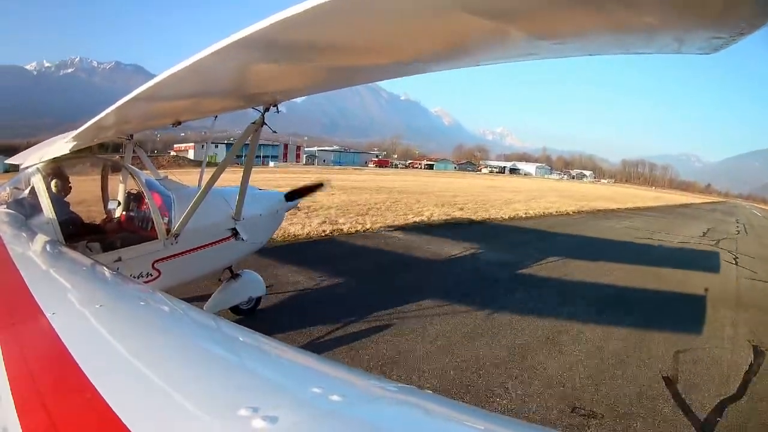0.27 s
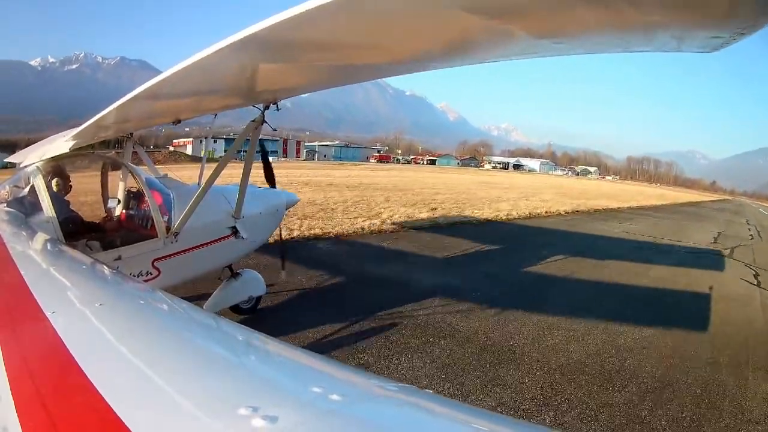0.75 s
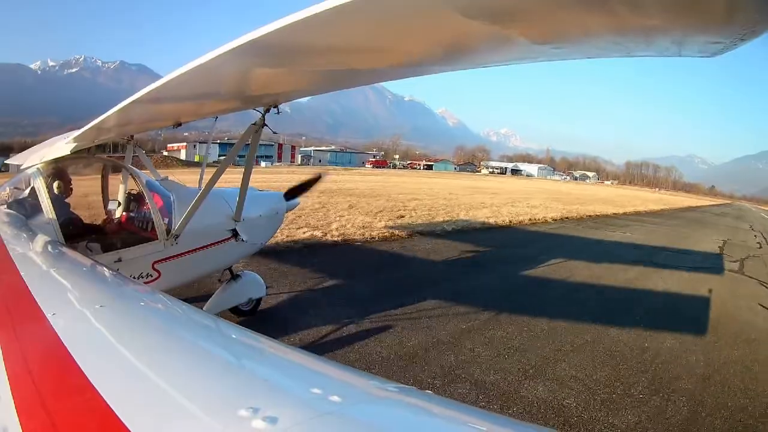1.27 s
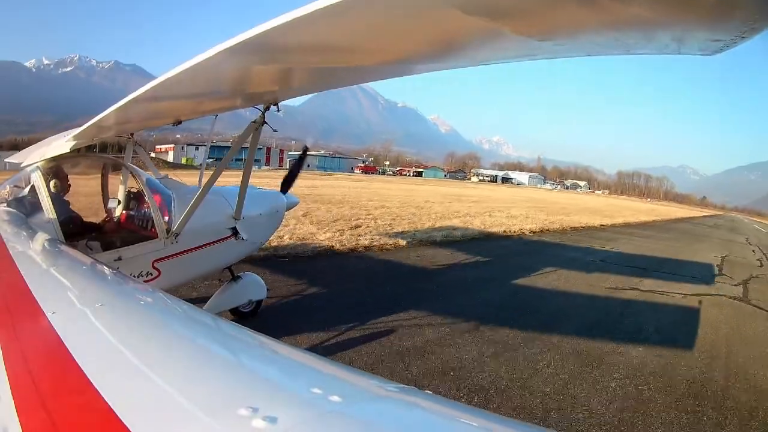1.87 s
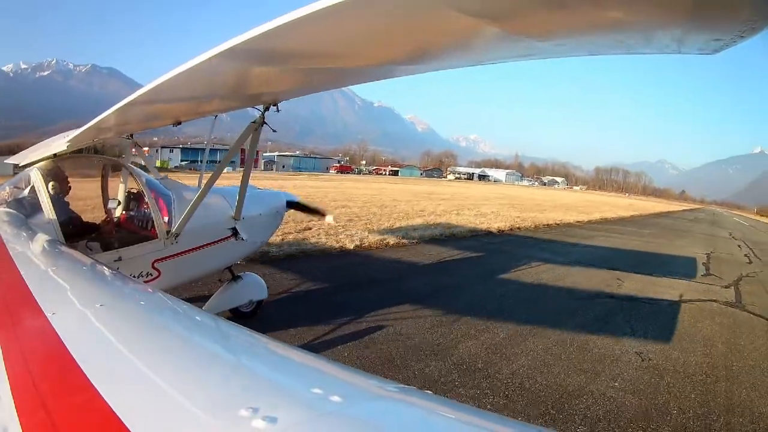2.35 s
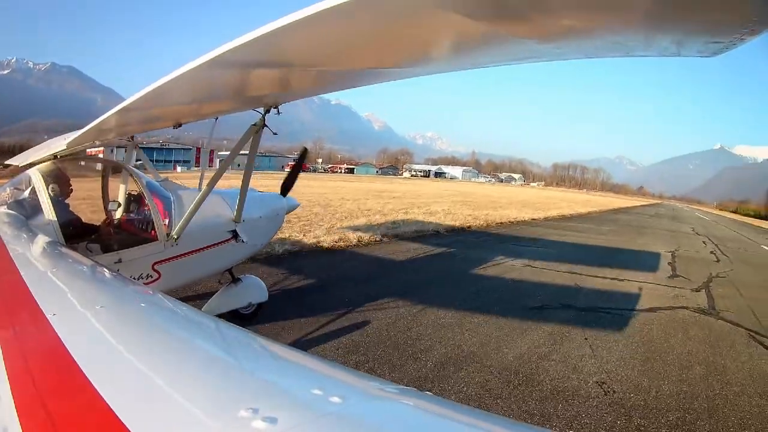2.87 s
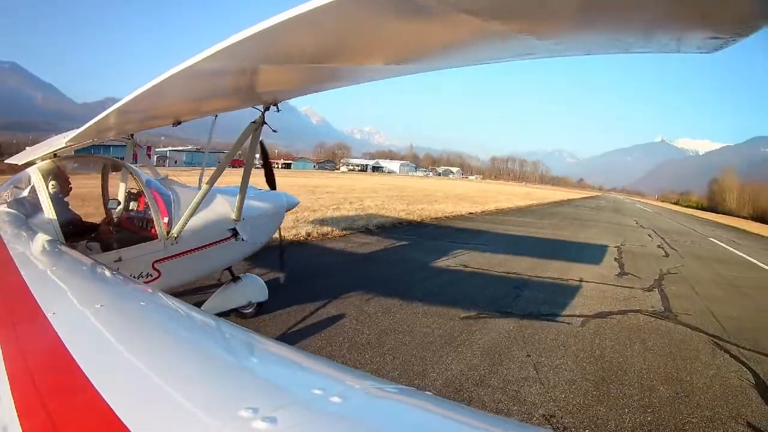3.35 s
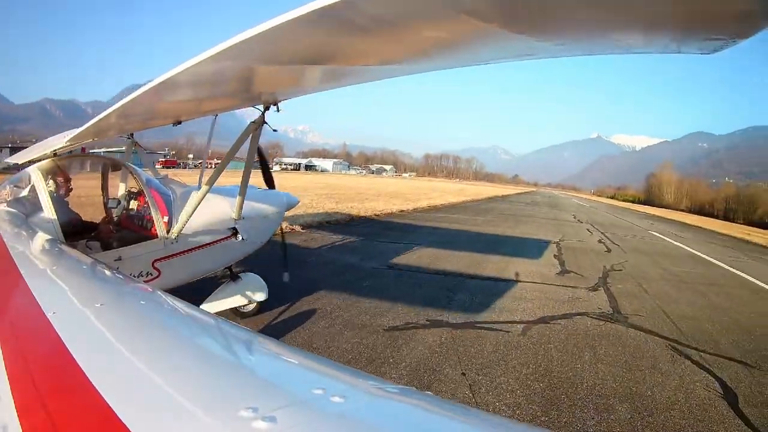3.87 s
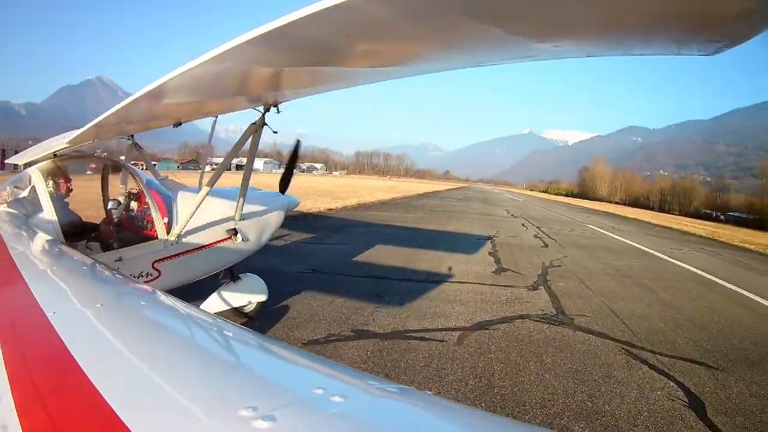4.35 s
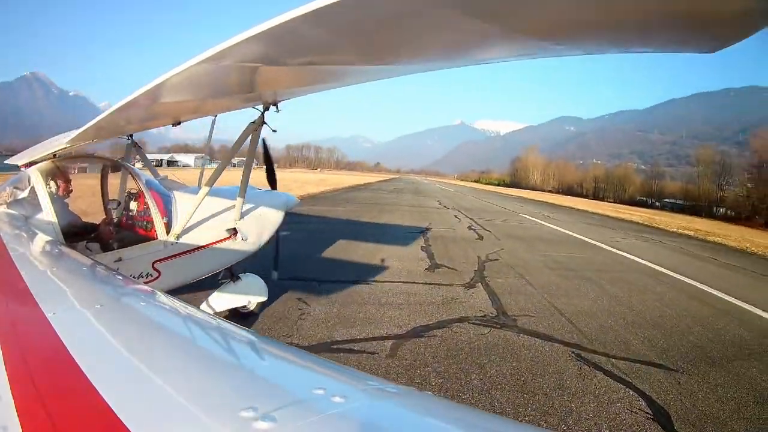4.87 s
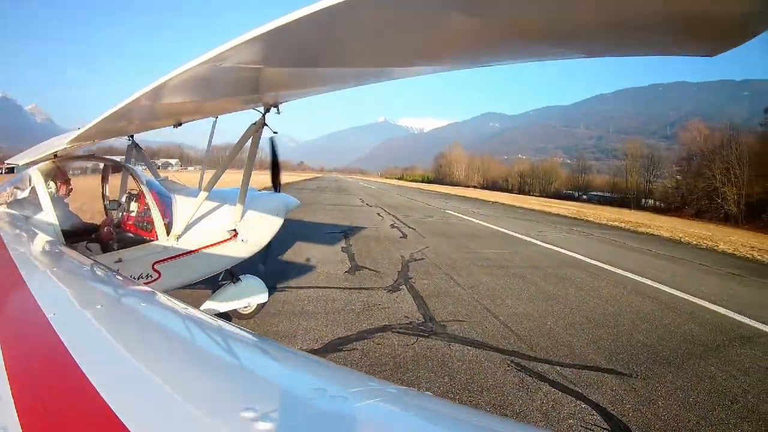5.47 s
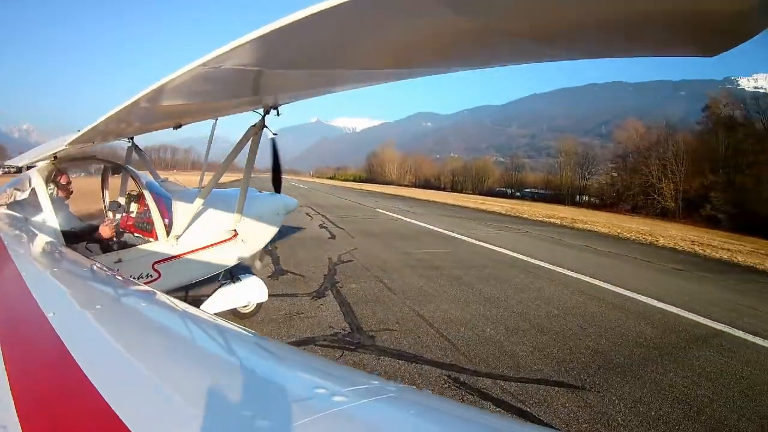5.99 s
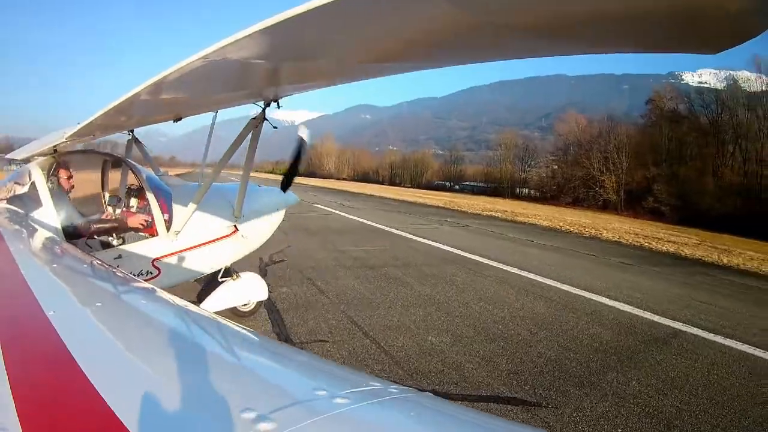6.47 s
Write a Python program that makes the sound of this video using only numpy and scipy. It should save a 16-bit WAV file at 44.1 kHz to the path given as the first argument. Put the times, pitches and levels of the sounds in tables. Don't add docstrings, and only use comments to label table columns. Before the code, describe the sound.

Dull wind buffeting and low taxiing rumble under overloaded thuds and dry case rattle, building to rapid regular pounding with short squeaks.

```python
import sys
import numpy as np
from scipy import signal
from scipy.io import wavfile
from scipy.ndimage import uniform_filter1d

SR = 44100
rng = np.random.default_rng(int(sys.argv[2]) if len(sys.argv) > 2 else 0)


def to_wav(s):
    ch = np.atleast_2d(s).T
    pcm = np.round(np.clip(ch, -1, 1) * 32767)
    wavfile.write(sys.argv[1], SR, pcm.astype(np.int16))


def boost(x):
    u = np.asarray(x, float) / 20
    return 10 ** u


N = 296352

# time in seconds, airflow in dB, engine effort in dB.
LOAD = [(0, -0.5, -1.5), (.32, 2, -1), (.66, 2.5, 3), (.89, 2, -1), (1.38, -4, -4.5), (1.9, -8, 1),
        (2.4, -5.5, 2), (3.02, -6.5, 3), (3.5, -5.5, 2), (3.85, -8.5, 5.5), (4.2, -7.5, 2.5),
        (4.6, -5.5, 8), (5.15, -7.5, 5), (5.67, -5, 7.5), (5.96, 9, 8), (6.2, 10, 10), (6.72, 10, 15)]
TYRE_TONES = [(148.7, 64, 4), (216, 71, 5.5), (318, 150, -5)]
DRONE_TONES = [(556, 380, -1.5), (900, 400, -5), (1460, 880, -4.5)]
CASE_TONES = [(2120, 910, -7.5), (4230, 700, 2.5), (5135, 475, 3.5), (5780, 1630, -0.5)]
BODY_TONES = [(545, 253, -0.5), (1470, 900, -6.5), (2300, 400, -7)]
SIZZLE_TONES = [(8800, 1530, -3.5), (10560, 520, 0.5)]
# pitch in Hz, level in dB.
ENGINE_TONES = [(21.5, -41.5), (129.2, -52)]
# time in seconds, peak in dB, suction before the snap in dB,
# snap time in ms.
SLAMS = [(0.02, -15, 8, 1), (0.209, -1.5, 1, 0.2), (0.479, -12, 7, 0.81), (0.534, 4, -12, 0.24),
         (0.539, -3, -20, 0.3), (0.793, 1, -3.5, 0.35), (0.881, -0.5, 1, 0.19), (0.974, -1.5, 4, 0.31),
         (1.064, 0.5, -3, 0.63), (2.119, 1.5, -1.5, 0.91), (2.269, -17, -16, 0.55), (2.329, -17, -3, 0.19),
         (2.581, -5.5, 0, 0.42), (2.629, -4, 2, 0.2), (2.677, -2, 2.5, 0.85), (3.005, -4, 4, 0.59),
         (3.054, 1, -1.5, 0.22), (3.098, 2, -2.5, 0.35), (4.024, -2.5, 0, 0.22), (4.07, 2.5, 0.5, 0.32),
         (4.111, 1.5, -1.5, 0.32), (4.149, -2.5, 3.5, 1), (4.191, -0.5, -8, 1), (4.282, -10, 9, 0.68),
         (4.451, -1.5, -2.5, 0.82), (5.126, -9.5, -11, 0.25), (5.161, -8.5, -2, 0.5),
         (5.194, -9.5, -6, 0.41), (5.703, -14.5, 4, 0.84), (5.763, -0.5, -7.5, 0.45)]
# time in seconds, peak in dB, push before the drop
# as a share of the peak, drop time in ms.
PULLS = [(.30, -13, 0.48, 2), (0.626, -15, 0.57, 0.61), (2.148, -10, .4, 2), (4.252, -16, 0.35, 0.9),
         (4.487, -14, .4, 2), (5.014, -18.5, 0.46, 2.03), (5.096, -15, 0.71, 1.2), (0.5185, 1, 0.4, 2.2),
         (0.5335, -7, 1.1, 0.9), (0.5385, 1, 0.05, 0.7), (.780, -4.5, 0.2, 0.99), (.865, -2.5, 0.31, 1.1),
         (0.956, 2, 0.33, 1.7), (1.045, -5.5, 0.67, 1.596), (2.572, -10, 0.34, 3.5), (2.617, 0.5, 0.27, 2),
         (3.038, -15, 0.29, 1.2), (3.085, -18, 0.44, 2), (4.062, -3, 0.2, 1), (4.1, -0.5, 0.47, 3.5),
         (4.141, -5, 0.26, 4.6), (4.185, -4, 0.22, 2.8), (4.359, -10, 0.27, 2), (4.444, -4, 0.17, 3.3),
         (5.146, -13.5, 0.7, 0.77), (5.18, -13.5, 0.73, 0.81), (5.754, 1.5, 0.19, 4.1),
         (5.798, -3.5, 0.27, 0.67)]
# time in seconds, shakes in Hz, first slam and second slam
# as signed pressures, lead of the second slam in ms.
SHAKING = [
    (5.812, 21.22, 1.5, -0.88, 17),
    (6.002, 21.9, 2, -1.15, 16),
    (6.275, 22.02, 2, -1.13, 18.5),
    (6.31, 22.46, -1.54, -1.2, 18.5),
    (6.362, 22.8, -1.5, -1.13, 22),
    (6.404, 22.72, -1.5, 1, 24),
    (6.5, 22.56, -1.5, 1, 23),
    (6.72, 21.73, -.8, 1.05, 27),
]
# first knock in
# seconds, its partner in seconds, last shake in seconds, number of shakes, peak in dB.
RATTLE_RUNS = [(.0568, .0675, .1387, 2, -26), (.1967, .2135, .289, 2, -27), (.4304, .442, .4773, 2, -25),
               (.469, .5128, .6616, 3, -22), (.5237, .5467, .6123, 2, -24), (.7603, .7885, 1.0386, 4, -21),
               (1.1377, 1.150, 1.2388, 2, -31), (1.3871, 1.4012, 1.481, 2, -24),
               (1.529, 1.543, 1.6144, 2, -25), (1.7145, 1.729, 1.8423, 4, -26),
               (2.018, 2.0395, 2.1055, 3, -25), (2.2108, 2.2527, 2.280, 2, -25),
               (2.378, 2.3916, 2.467, 3, -25), (2.5223, 2.5353, 2.5223, 1, -21),
               (2.561, 2.5835, 2.6091, 2, -16.5), (2.742, 2.7625, 2.7859, 2, -28),
               (2.8474, 2.864, 2.9435, 3, -26), (2.994, 3.0068, 3.083, 3, -20),
               (3.1296, 3.1425, 3.1714, 2, -27), (3.3016, 3.317, 3.3547, 2, -28),
               (3.4524, 3.463, 3.5497, 3, -25), (3.599, 3.6165, 3.647, 2, -25),
               (3.701, 3.7365, 3.782, 2, -23),
               (3.9903, 4.013, 4.242, 4, -19), (4.3201, 4.344, 4.4378, 4, -22),
               (4.496, 4.5277, 4.5718, 2, -22), (4.6038, 4.6228, 5.0064, 12, -23),
               (5.0434, 5.0605, 5.2497, 7, -18.5), (5.3153, 5.351, 5.5127, 3, -27),
               (5.4636, 5.486, 5.5688, 2, -26), (5.2879, 5.334, 5.368, 2, -30),
               (5.6135, 5.632, 5.6135, 1, -29), (4.1399, 4.198, 4.1399, 1, -26),
               (5.6562, 5.669, 5.692, 2, -23)]
# time in seconds,
# peak in dB.
EXTRA_KNOCKS = [(.035, -16), (.1387, -22), (.2392, -24), (.289, -24), (.4887, -19.5), (.5668, -22),
                (.6273, -23.5), (.6706, -24), (.7692, -22), (1.0386, -19), (1.283, -37), (1.378, -19),
                (1.872, -23), (1.9468, -26), (2.0382, -16), (2.148, -26), (2.3303, -25), (2.66, -21.5),
                (2.7117, -28.5), (2.8023, -15), (3.2234, -31), (3.2585, -33), (3.4083, -27), (3.429, -24.5),
                (3.8363, -26), (3.933, -26), (4.056, -22), (4.1186, -23.5), (4.226, -30), (4.2878, -22.5)]
# start in seconds, level in dB, length in
# seconds, pitch in Hz.
SCRAPES = [
    (0.394, -29.5, 0.023, 920),
    (0.51, -25.5, 0.042, 850),
    (1.096, -33, 0.063, 860),
    (1.419, -41, 0.028, 900),
    (1.296, -44, 0.0086, 2160),
    (1.343, -44, 0.009, 2300),
    (1.585, -42, 0.01, 2300),
    (1.981, -43, 0.0067, 2300),
    (3.275, -31.5, 0.0099, 1820),
    (5.748, -36, 0.013, 4100),
]
# time in seconds, peak in dB, pitch in Hz.
SQUEAKS = [
    (6.503, -23, 1410),
    (6.548, -10.5, 1290),
    (6.595, -10.5, 1390),
    (6.6385, -10, 1420),
    (6.6838, -8.5, 1436),
]


def level(x, db):
    return x * boost(db) / np.sqrt(np.mean(x ** 2))


def band(x, hz, width):
    return signal.lfilter(*signal.iirpeak(hz, hz / width, fs=SR), x)


def band_twice(x, hz, width):
    return band(band(x, hz, width), hz, width)


def modes(x, table):
    out = 0
    for k, (hz, width, db) in enumerate(table):
        out = out + (-1) ** k * boost(db) * band(x, hz, width)
    return out


def walk(rate):
    hold = int(SR / rate)
    steps = np.repeat(rng.standard_normal(N // hold + 1), hold)
    return 1.3 * uniform_filter1d(uniform_filter1d(steps, hold), hold)[:N]


def flutter(table, depth_db, rate):
    out = np.zeros(N)
    for hz, width, db in table:
        flicker = boost(db + depth_db * walk(rate))
        out += flicker * band_twice(rng.standard_normal(N), hz, width)
    return level(out, 0)


def add(out, s, piece):
    i = max(int(s * SR), 0)
    out[i:i + len(piece)] += piece[:max(N - i, 0)]


def load():
    s, air_db, effort_db = np.transpose(LOAD)
    t = np.arange(N) / SR
    return np.interp(t, s, air_db), np.interp(t, s, effort_db)


def wind(air_db):
    return boost(np.minimum(-29 + air_db, -27)) * flutter([(25.9, 32, -1.5), (58.0, 63, -8.5)], 4.6, 15)


def tyres(air_db):
    return boost(np.minimum(-31.5 + 1.18 * air_db, -26)) * flutter(TYRE_TONES, 1.5, 40)


def engine(effort_db):
    t = np.arange(N) / SR
    exhaust = boost(-40.5) * flutter([(131.2, 49, 0)], 2.6, 17)
    drone = boost(-49 + effort_db) * flutter(DRONE_TONES, 3, 60)
    tones = np.zeros(N)
    for hz, db in ENGINE_TONES:
        tones += boost(db + 6 + 2.0 * walk(4.65)) * np.sin(2 * np.pi * hz * t)
    return exhaust + drone + tones


def hiss(effort_db):
    hiss_db = np.minimum(-50 + 1.1 * effort_db, -43)
    noise = modes(rng.standard_normal(N), CASE_TONES + [(9860, 1300, 0.54)])
    return boost(hiss_db + 6.0 * walk(110)) * level(noise, -5.5)


def shakes():
    s, hz = np.transpose(SHAKING)[:2]
    times = [s[0]]
    while len(times) < 40:
        times.append(times[-1] + 1 / np.interp(times[-1], s, hz))
    return np.array(times)


def slam(size, suction, snap_ms, before_s=0.0085, after_s=0.0091, ring_hz=38.0, rebound=0.):
    t = np.arange(-1323, 2646) / SR
    across = .5 + .5 * np.tanh(t * 1000 / max(snap_ms, .05))
    leak = np.exp(-(np.abs(t) / after_s) ** 1.19)
    after = leak - rebound * np.exp(-((t - .0032) / 0.001) ** 2)
    before = np.exp(-np.abs(t) / before_s) * np.cos(2 * np.pi * ring_hz * t)
    return size * (across * after - suction * (1 - across) * before)


def lone_slams():
    out = np.zeros(N)
    for s, db, suction_db, snap_ms in SLAMS:
        add(out, s - .0285, slam(1.2 * boost(db), boost(suction_db), 1.3 * snap_ms))
    for s, db, push, drop_ms in PULLS:
        add(out, s - .03, slam(-1.4 * boost(db), push, drop_ms, after_s=0.0077))
    return out


def shake_slams():
    out = np.zeros(N)
    s, _, first, second, lead_ms = np.transpose(SHAKING)
    chance = rng.standard_normal((40, 4))
    for now, (a, b, late, loose) in zip(shakes(), chance):
        since = now - s[0]
        size = np.interp(now, s, first) * boost(1.5 * a)
        rebound = np.clip(0.45 - 0.4 * since + 0.98 * loose, 0, 1.1)
        add(out, now - .03, slam(size, 0.9, 0.4, before_s=0.005, after_s=0.007, ring_hz=30.7, rebound=rebound))
        if since > 0:
            ahead = now - .03 - np.interp(now, s, lead_ms) / 1000 + 0.0011 * late
            size = np.interp(now, s, second) * boost(2.5 + 2.4 * b)
            snap_ms = 0.6 + 0.6 * since
            add(out, ahead, slam(size, 0.44, snap_ms, before_s=0.019, after_s=0.0095, ring_hz=25.5))
    return out


def membrane():
    out = lone_slams() + shake_slams()
    swing = uniform_filter1d(np.abs(out), size=1100)
    wobble = level(band_twice(rng.standard_normal(N), 90., 90.), -16)
    rough = level(band(band(rng.standard_normal(N), 210.0, 590.0), 215.0, 377.0), -28)
    return out + swing * (wobble + rough)


def run_knocks():
    rows = []
    for first, partner, last, count, db in RATTLE_RUNS:
        for s in np.linspace(first, last, int(count)):
            rows.append((s, db))
            rows.append((s + partner - first, db - 2 * (partner > first)))
    return rows


def slam_knocks(now):
    lead = np.interp(now, *np.transpose(SHAKING)[[0, 4]]) / 1000
    firsts = np.r_[2 * now[0] - now[1], now]
    rows = []
    # times, level in dB, lag behind the snap in ms, drift in ms per second
    for times, db, lag_ms, slip in ((firsts, -20, -1, 2), (now - lead, -18.5, -5, 7.5)):
        for s in times[times < N / SR]:
            since = s - now[0]
            rows.append((s + (lag_ms + slip * since) / 1000, db + 5 * since))
    return rows


def knocks():
    now = shakes()
    rows = np.array(run_knocks() + slam_knocks(now))
    rows[:, 1] += 2.2 * rng.standard_normal(len(rows))
    rows = np.vstack([rows, EXTRA_KNOCKS])
    late, weak, luck = rng.random((len(rows), 3)).T
    bounce_s = np.interp(late ** 2, (0, 1), (.0045, .013))
    bounce_db = np.interp(weak, (0, 1), (-3, -13))
    bounced = rows + np.transpose([bounce_s, bounce_db])
    return np.vstack([rows, bounced[(luck < .33) | (rows[:, 0] > now[0])]])


def rattle():
    crack, thud, busy = np.zeros(N), np.zeros(N), np.zeros(N)
    t = np.arange(900) / SR
    for s, db in knocks():
        tilt, weight = rng.random(2)
        noise, spikes = rng.standard_normal((2, len(t)))
        head = level(band(noise * np.exp(-t / 0.00028), 3700 + 3200 * tilt, 3360.0), -16.0)
        length = .004 + .005 * weight
        jumps = boost(4.3 * uniform_filter1d(spikes, size=20) * 20 ** .5)
        chatter = 0.17 * noise * np.exp(-(t / length) ** 2) * jumps
        tail = chatter + 0.059 * noise * np.exp(-t / 0.035)
        add(crack, s, boost(db + 2.0) * (head + tail))
        add(crack, s - .004, boost(db - 11.5) * spikes[:176] * t[:176] / 0.0036)
        thump = noise * np.exp(-((t - .002) / 0.0046) ** 2)
        add(thud, s, boost(0.75 * db - 4.5 + 7.86 * weight) * thump)
        add(busy, s - .006, boost(0.32 * db - 17.5) * np.hanning(len(t)))
    specks = (rng.random(N) < 150 / SR) * rng.exponential(size=N)
    specks = signal.lfilter([1], [1, -.94], specks) + 0.055
    crumbs = (rng.random(N) < 140 / SR) * np.minimum(rng.exponential(size=N), 1.8)
    crumbs = signal.lfilter([1], [1, -.93], crumbs)
    crack = crack + 2.3 * busy * crumbs * rng.standard_normal(N)
    sizzle = boost(-8.5) * crack + busy * specks * rng.standard_normal(N)
    return modes(crack, CASE_TONES) + modes(thud, BODY_TONES) + modes(sizzle, SIZZLE_TONES)


def scrapes():
    out, t = np.zeros(N), np.arange(4000) / SR
    for s, db, length, hz in SCRAPES:
        grit = band_twice(rng.standard_normal(len(t)) ** 3, hz, 660.0)
        add(out, s, level(grit, db) * np.minimum(t / 0.0035, 1) * np.exp(-(t / length) ** 2))
    return out


def squeaks():
    out, t = np.zeros(N), np.arange(700) / SR
    for s, db, hz in SQUEAKS:
        ring = np.sin(2 * np.pi * hz * (t + 3.6 * t ** 2))
        add(out, s, boost(db) * ring * (t / 0.0039) * np.exp(1 - t / 0.0016))
    return out


def scene():
    air_db, effort_db = load()
    bed = wind(air_db) + tyres(air_db) + engine(effort_db) + hiss(effort_db)
    return (bed + membrane() + rattle() + scrapes() + squeaks())[None]


def top_cut(x):
    return signal.sosfilt(signal.butter(12, 12410, fs=SR, output="sos"), x)


def record(dry):
    x = signal.lfilter(*signal.butter(1, 18., "high", fs=SR), dry)
    for notch_hz in (8050., 7950.):
        x = signal.lfilter(*signal.iirnotch(notch_hz, 8., fs=SR), x)
    x = signal.sosfilt(signal.ellip(8, .5, 45, 12050., fs=SR, output="sos"), x)
    return top_cut(np.clip(x, -.9, .9))


dry = scene()
out = record(dry)
to_wav(out)
```